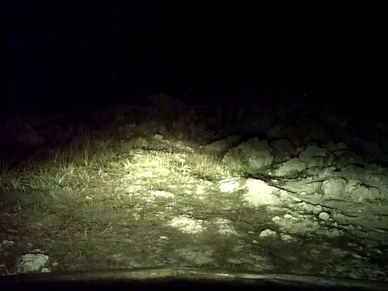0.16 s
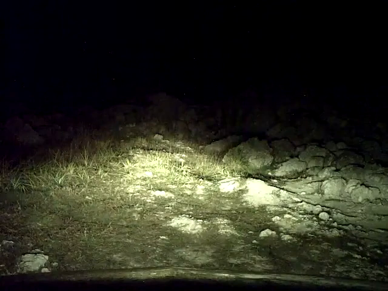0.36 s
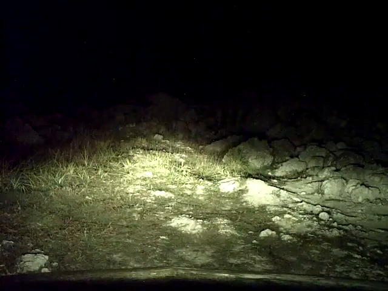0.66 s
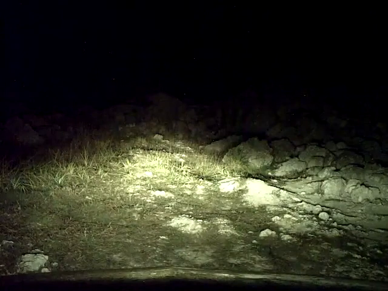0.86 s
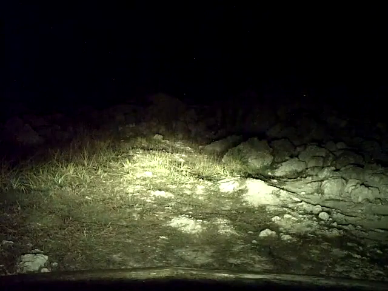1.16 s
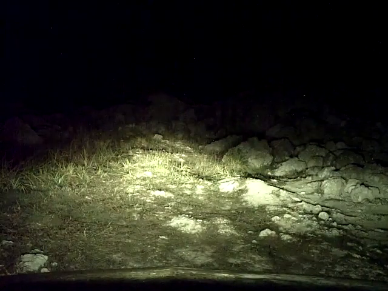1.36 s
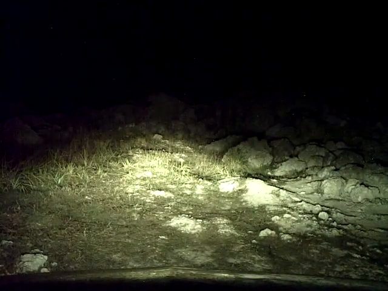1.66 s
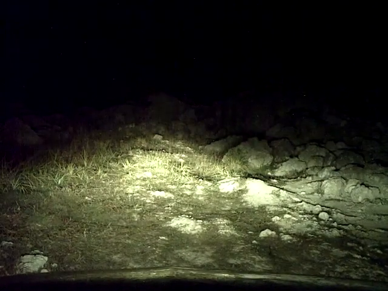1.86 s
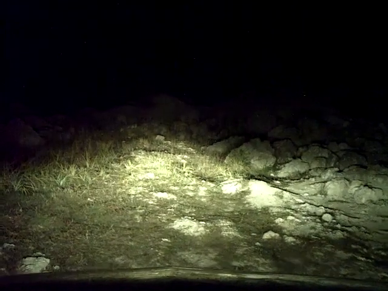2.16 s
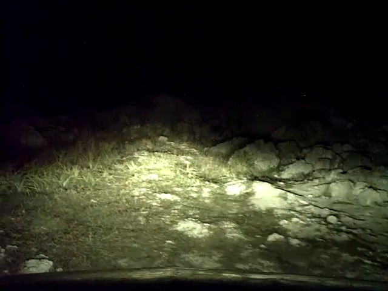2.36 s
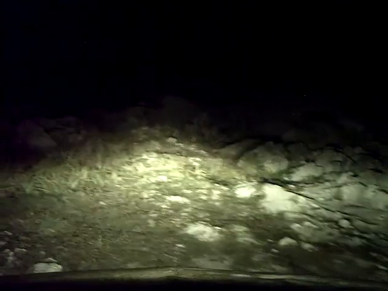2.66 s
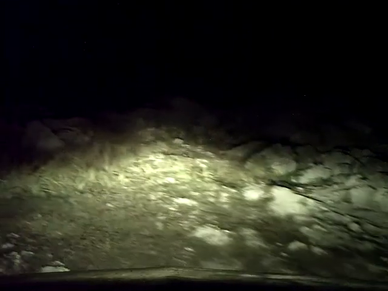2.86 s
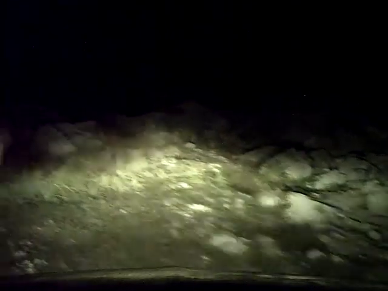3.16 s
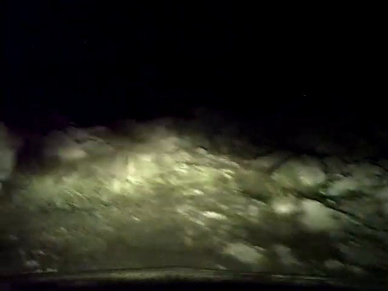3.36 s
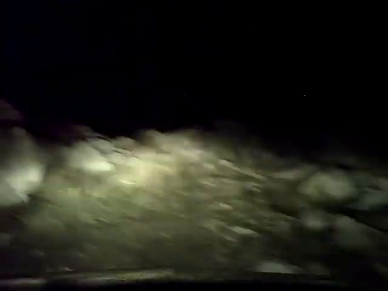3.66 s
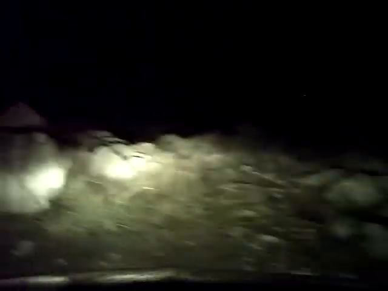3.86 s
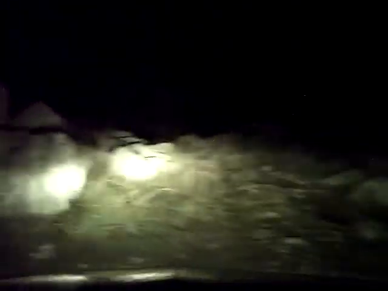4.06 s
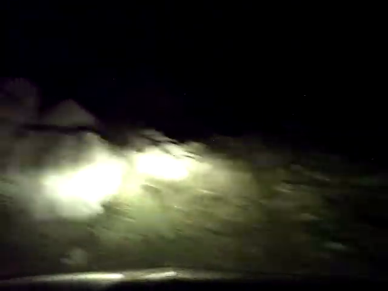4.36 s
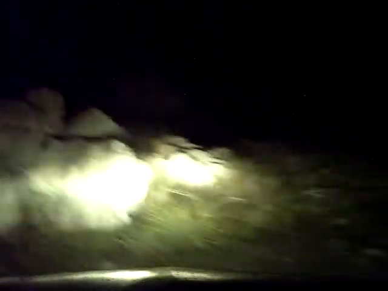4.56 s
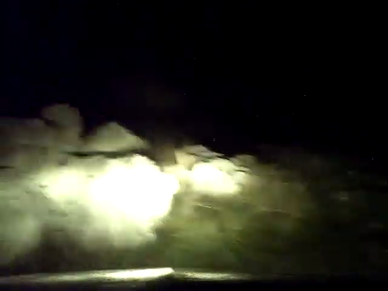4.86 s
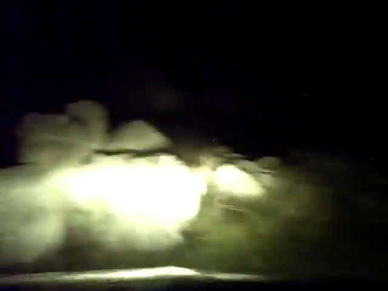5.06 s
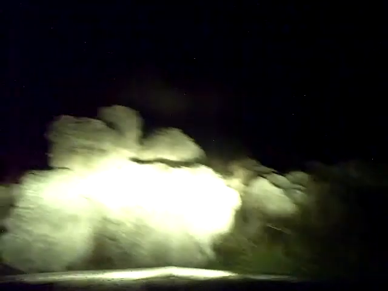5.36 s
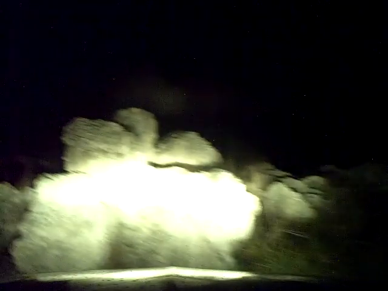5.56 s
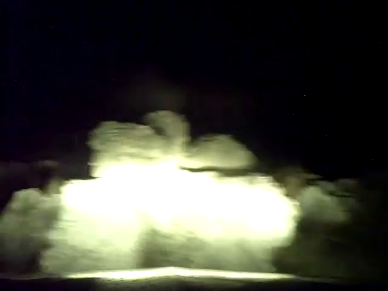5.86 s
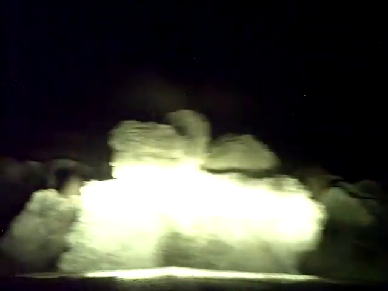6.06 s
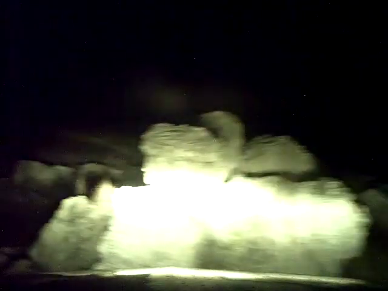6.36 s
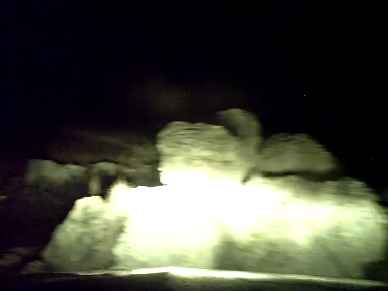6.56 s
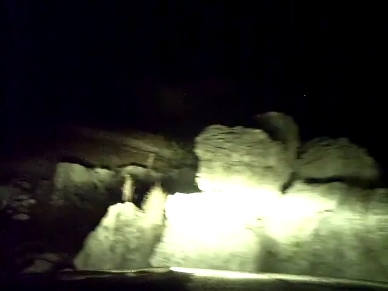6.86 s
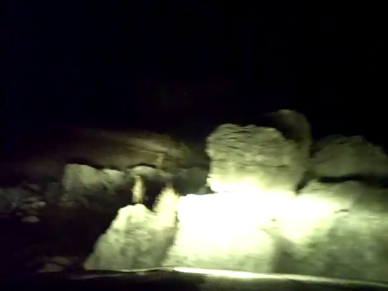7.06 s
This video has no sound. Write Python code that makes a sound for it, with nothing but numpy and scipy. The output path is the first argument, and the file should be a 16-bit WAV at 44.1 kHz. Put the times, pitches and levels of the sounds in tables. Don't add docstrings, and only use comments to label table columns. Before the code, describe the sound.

Boomy truck engine heard from the cab, crawling over rocks: a brief surge, rattling and groaning, then denser clatter, with faint crickets outside.

```python
import sys
import numpy as np
from scipy import signal
from scipy.io import wavfile
from scipy.ndimage import uniform_filter1d

SR = 44100
rng = np.random.default_rng(int(sys.argv[2]) if len(sys.argv) > 2 else 0)


def to_linear_factor(level_db):
    exponent = np.asarray(level_db, float) / 20
    return 10 ** exponent


def file_out(sig):
    cols = np.atleast_2d(sig).T
    lim = np.clip(cols, -1, 1)
    pcm = np.round(lim * 32767).astype(np.int16)
    wavfile.write(sys.argv[1], SR, pcm)


N = 317520
TIME = np.arange(N) / SR


def rms_one(x):
    return x / np.sqrt(np.mean(x ** 2) + 1e-20)


def in_time(rows):
    s, value = np.transpose(rows)
    return np.interp(TIME, s, value)


def at_hz(points, hz):
    table_hz, db = np.transpose(points)
    return np.interp(np.log(hz), np.log(table_hz), db)


def swell(s, rise_s, fall_s):
    return np.exp(-((TIME - s) / np.where(TIME < s, rise_s, fall_s)) ** 2)


def drift(rate):
    r = np.exp(-80 * np.pi * rate / SR)
    white = rng.standard_normal(N // 40 + 2002)
    slow = signal.lfilter([1], [1, -2 * r, r * r], white)[2000:]
    return np.interp(np.arange(N) / 40, np.arange(len(slow)), rms_one(slow))


def wave(hz):
    return np.sin(2 * np.pi * np.cumsum(hz) / SR)


def resonate(x, hz, width_hz):
    r = np.exp(-np.pi * width_hz / SR)
    feedback = [1, -2 * r * np.cos(2 * np.pi * hz / SR), r * r]
    return signal.lfilter([(1 - r * r) / 2, 0, (r * r - 1) / 2], feedback, x)


def band(x, low_hz, high_hz):
    sos = signal.butter(2, [low_hz, min(high_hz, .45 * SR)], "band", fs=SR, output="sos")
    return signal.sosfilt(sos, x)


def banded_noise(spectrum, patchy_db, flicker):
    hz = np.transpose(spectrum)[0]
    edges = hz[0] * 2 ** np.arange(0, np.log2(hz[-1] / hz[0]), 1 / 3)
    out, together, white = 0, drift(flicker), rng.standard_normal((2, N))
    for k, (low, high) in enumerate(zip(edges, edges[1:])):
        level_db = at_hz(spectrum, np.sqrt(low * high))
        flicker_db = patchy_db * (0.61 * together + drift(flicker))
        out = out + to_linear_factor(level_db + flicker_db) * band(white[k % 2], low, high)
    return rms_one(out)


def add(out, s, piece):
    at = round(s * SR)
    out[at:at + len(piece)] += piece[:N - at]


def whistles(rows):
    out = np.zeros(N)
    for s, length, hz, glide_hz, db in rows:
        t = TIME[:round(length * SR)]
        rough = 1 + 3 * band(rng.standard_normal(SR // 4), 30, 200)[-len(t):]
        tone = np.sin(2 * np.pi * (hz * t + glide_hz * t * t / length / 2))
        add(out, s, np.sqrt(2) * to_linear_factor(db) * rough * np.sin(np.pi * t / length) * tone)
    return out


def blows(rows, rise, octaves, click, ring=0):
    out, t, half = np.zeros(N), TIME[:SR // 4], 2 ** (np.clip(octaves, .15, 3.5) / 2)
    for s, db, hz, length in rows:
        tail = 0.032 * np.exp(-t / (4.2 * length))
        shape = (1 - np.exp(-t / rise)) * (np.exp(-(t / length) ** 2) + tail)
        strength = np.sqrt(np.sum(shape ** 2))
        push = shape * rng.standard_normal(len(t))
        push[round(rise * SR)] += click * strength
        push += ring * np.sqrt(hz / SR) * shape * np.sin(2 * np.pi * hz * t)
        burst = band(push, hz / half, hz * half)
        burst += 0.029 * band(push, hz / half / 3, hz / half)
        add(out, s - rise, to_linear_factor(db) * burst * strength / np.sqrt(np.sum(burst ** 2)))
    return out


def far_cricket():
    # (time [s], level [dB])
    chirps = [(.06, -79), (.13, -78), (.451, -79), (.52, -82), (.59, -80), (1.04, -79), (1.12, -80),
              (1.19, -82), (1.5, -81), (1.629, -79)]
    return whistles([(s, .05, 4120, -420, db - 0.5) for s, db in chirps])


def near_cricket():
    # (time [s], level [dB])
    trill = [
        (0, -83),
        (2.2, -84.5),
        (4, -88),
        (5.9, -86),
        (6.2, -80),
        (6.3, -74),
        (6.65, -74.5),
        (6.78, -82),
        (7.2, -84),
    ]
    note_hz, width_hz, throbs_per_s = 6115, 250, 42.7
    turn = 2 * np.pi * throbs_per_s * TIME + .5
    gate = np.exp(.8 * np.cos(turn) + .5 * np.cos(3 * turn))
    waver = 2.4 * np.sin(turn + 1) + 1.5 * drift(10)
    note = np.sin(2 * np.pi * note_hz * TIME + waver)
    note += .5 * rms_one(resonate(rng.standard_normal(N), note_hz, width_hz))
    return to_linear_factor(in_time(trill)) * rms_one(gate * note)


def noise_gain(firing_hz, idle_db, doubling_db, ground_share):
    # (time [s], level over smooth going [dB])
    ground = [(0, 1.5), (.3, 0), (1.4, 1), (1.8, 2), (2.3, 2), (2.9, 1.5), (3.6, 1), (4.0, 0.5), (4.6, 0.5),
              (5.0, 4.5), (5.3, 3.5), (5.6, 3.5), (5.85, 1.5), (6.1, 1.5), (6.3, 1), (6.7, 1.5), (7.0, 2.5),
              (7.2, 7)]
    return to_linear_factor(idle_db + doubling_db * np.log2(firing_hz / 28) + ground_share * in_time(ground))


def hiss(firing_hz):
    # (frequency [Hz], level [dB per Hz])
    spectrum = [(1180, -23), (2000, 1.5), (4380, -7), (6000, -1.5), (8210, -9.5), (9860, 12), (10500, -4),
                (11500, -43), (15000, -59), (22000, -120)]
    return noise_gain(firing_hz, -70, 1.7, 1.4) * banded_noise(spectrum, patchy_db=1.14, flicker=15.4)


def roar(firing_hz):
    # (frequency [Hz], level [dB per Hz])
    spectrum = [(220, -16), (380, -6), (520, -9), (667, -9), (998, -15.5), (1120, -13), (1390, -15),
                (1820, -32.5), (2600, -35.5), (3380, -33.5), (5720, -120)]
    # (frequency [Hz], width [Hz], level [dB])
    bulkhead = [(1129, 27, -16), (1415, 77, -22), (1796, 27, -39), (2090, 200, -23.5)]
    throb = 1 + 0.087 * np.cos(2 * np.pi * np.cumsum(firing_hz) / SR)
    noise = banded_noise(spectrum, patchy_db=1.2, flicker=10.6)
    for hz, width_hz, db in bulkhead:
        noise += to_linear_factor(db) * rms_one(resonate(rng.standard_normal(N), hz, width_hz))
    return noise_gain(firing_hz, -58, 7.1, 0.76) * throb * noise


def rumble(firing_hz):
    # (frequency [Hz], level [dB per Hz])
    spectrum = [(24, -22.5), (40, -10.5), (62, -9), (95, -7.5), (129, -11), (246, -12), (500, -33),
                (650, -71), (1100, -120)]
    return noise_gain(firing_hz, -47, 6.1, 0.82) * banded_noise(spectrum, patchy_db=1.0, flicker=23.0)


def rocking():
    # (frequency [Hz], wander [Hz], level [dB])
    mounts = [(18.7, 0.24, -3.5), (23.7, 1.27, -6), (35.5, 1.867, -10), (45.26, 2.186, -11)]
    # (time [s], level [dB])
    sways = [(.2, -42), (.95, -40), (1.5, -37.5), (2.0, -36), (2.6, -37), (3.202, -36), (3.8, -33),
             (4.8, -32), (5.25, -32), (6.0, -34.5), (6.45, -41.5), (7.0, -34)]
    sway_s, always_db = 0.14, -45
    strength = to_linear_factor(always_db) + sum(to_linear_factor(db) * swell(s, sway_s, sway_s) for s, db in sways)
    motion = 0
    for hz, wander_hz, db in mounts:
        motion = motion + to_linear_factor(db + 1.0 * drift(1.8)) * wave(hz + wander_hz * drift(2.07))
    return strength * rms_one(motion)


def rustle():
    # (time [s], level [dB], pitch [Hz], length [s])
    rows = [
        (6.8, -67, 7400, 0.18),
        (6.92, -68, 7440, 0.17),
    ]
    return blows(rows, rise=0.027, octaves=.8, click=0)


def squeaks():
    # (time [s], length [s], pitch [Hz], glide [Hz], level [dB])
    rows = [(0.47, 0.12, 2600, -140, -80), (.56, .09, 2640, 50, -78), (0.65, 0.06, 2900, 30, -72),
            (.58, .07, 2520, 0, -78), (1.93, .23, 1745, 60.5, -68), (2.17, .16, 1795, 0, -70.5),
            (3.52, .19, 1790, 0, -68.5), (2, .08, 1640, 20, -70), (0.29, 0.13, 3360, 2, -84),
            (1.595, 0.06, 2490, -68, -68), (1.61, 0.063, 3350, 2, -76), (1.739, 0.0034, 10000, 2, -59.5),
            (1.4, .004, 9900, 0, -64), (1.848, 0.0035, 9900, 9, -62), (6.445, .012, 10020, 0, -76),
            (6.1, 0.01204, 10080, 2, -73), (6.146, .012, 10180, 0, -78), (6.2, 0.017, 10100, -3, -70),
            (6.3, 0.013, 10100, 0, -68)]
    return whistles(rows)


def creaks():
    # (time [s], level [dB], pitch [Hz], length [s])
    rows = [(1.0, -47.5, 124, .25), (.05, -46, 124.6, .15), (1.1, -44, 88, .2), (3.2, -40, 93, 0.093),
            (4.17, -41, 130, 0.096), (6.62, -46, 128, .08), (3.58, -40, 160, .06), (5.7, -43, 124, .1),
            (5.3, -39, 160, .06), (7.11, -40, 210, .05)]
    return blows(rows, rise=.02, octaves=0.37, click=0, ring=1.1)


def groans():
    # (time [s], level [dB], pitch [Hz], length [s])
    rows = [(1.7, -47.5, 274, 0.13), (3.74, -50.5, 520, 0.064), (1.43, -51.5, 320, 0.092),
            (4.1, -54.5, 460, 0.11), (1.85, -52.5, 806, 0.04), (2.1, -44, 186.5, 0.09),
            (2.85, -45, 175, 0.22), (2.4, -50, 382, .1), (2.28, -40.5, 189, 0.13), (2.3, -51, 586, 0.39),
            (2.45, -50, 268, 0.3), (4.405, -66.5, 3085, 0.068), (4.42, -69, 5560, 0.051),
            (5.05, -30, 37.3, 0.058), (5.995, -48, 390, 0.061), (6.8, -48, 435, 0.029),
            (6.848, -42.5, 405, 0.022)]
    return blows(rows, rise=0.0072, octaves=0.29, click=0.28)


def ticks():
    # (time [s], level [dB], pitch [Hz], length [s])
    rows = [(.22, -67, 7490, .014), (1.135, -64, 4910, .008), (1.173, -56, 5600, 0.01),
            (1.215, -65.5, 6590, 0.024), (2.026, -58.5, 5510, 0.013), (2.336, -62.5, 7380, 0.031),
            (2.391, -56, 5370, 0.0055), (2.673, -54.5, 7200, 0.009), (2.794, -62, 6020, .005),
            (2.803, -58, 6000, .01), (4.02, -59, 6500, 0.0039), (4.067, -62, 7000, 0.0038),
            (2.694, -60, 7500, .003), (2.726, -63, 6500, .008), (.8, -64, 4800, 0.012),
            (4.297, -63, 4023, .017), (4.6, -62, 5370, 0.0054), (4.818, -68, 5770, 0.019),
            (4.857, -55.5, 3785, 0.0052), (4.921, -59, 6030, 0.0076), (4.974, -62, 5024, 0.018),
            (5.143, -51, 6230, 0.027), (5.172, -65, 5490, .023), (5.423, -51, 6210, 0.012),
            (5.446, -54, 5890, .01), (5.527, -58.5, 4960, 0.035), (5.545, -47, 4300, 0.012),
            (5.746, -67, 5270, 0.0098), (5.969, -61, 6100, 0.018), (5.982, -67, 7000, .01),
            (6.22, -70, 6000, .01), (6.187, -68, 4500, 0.023), (6.77, -49.5, 4370, 0.0087),
            (6.976, -65, 6350, 0.021), (7.151, -54, 3556, 0.0076)]
    return blows(rows, rise=0.0013, octaves=1.0, click=0.47)


def pings():
    # (time [s], level [dB], pitch [Hz], length [s])
    rows = [(2.616, -49.5, 2800, 0.0029), (2.638, -62, 4900, .003), (3.1, -66, 8200, .004),
            (3.31, -59, 3350, .004), (3.672, -52, 775, .012), (4.085, -48, 474, .01),
            (3.958, -56, 1750, .02), (4.02, -56, 5500, 0.0047), (4.067, -52.5, 6140, 0.0047),
            (5.834, -47.5, 830, 0.024), (5.51, -49, 620, .008), (4.297, -57, 1630, 0.02),
            (4.3, -62, 2900, .014), (4.313, -55.5, 1480, 0.016), (4.3, -58, 890, 0.008),
            (3.958, -64, 2300, .015), (7.026, -52, 680, 0.0037), (7.067, -45, 484, .012),
            (5.957, -50, 660, 0.013)]
    return blows(rows, rise=0.001, octaves=0.33, click=1.0, ring=1.1)


def clacks():
    # (time [s], level [dB], pitch [Hz], length [s])
    rows = [(.05, -64, 2900, 0.013), (.02, -66, 2600, .008), (1.17, -55, 1290, 0.011),
            (1.295, -55, 1140, 0.011), (1.775, -58, 2500, 0.0087), (1.79, -62, 3000, .012),
            (.796, -63, 2200, 0.0055), (3.672, -61, 1900, 0.0087), (4.018, -57, 2400, 0.0044),
            (4.599, -61, 1700, .008), (4.812, -69, 1920, .01), (5.093, -58, 1700, .015),
            (5.331, -61, 2550, .006), (5.642, -59, 1800, .008), (6.974, -65, 1850, .008),
            (3.161, -57, 1262, 0.029), (3.956, -65, 1960, 0.015), (4.296, -56.5, 1900, 0.016),
            (4.64, -63, 2780, 0.0055), (4.859, -56, 1163, 0.012), (4.972, -51.5, 1280, .012),
            (4.995, -58, 1978, 0.02), (5.141, -57, 2566, .028), (5.183, -59, 2205, .022),
            (5.404, -53, 1387, 0.0053), (5.425, -56.5, 2470, 0.012), (5.511, -56, 1790, 0.04),
            (5.528, -53, 3000, 0.011), (5.545, -44.5, 2090, 0.015), (5.651, -60, 1088, 0.021),
            (5.684, -60, 2300, 0.013), (5.826, -58, 2188, 0.0078), (6.06, -66, 6000, .008),
            (6.076, -53, 2080, 0.0096), (6.078, -63, 5200, .008), (6.19, -54.5, 2190, 0.0074),
            (6.621, -56, 1490, 0.023), (6.77, -55, 1488, 0.0061), (7.149, -47, 2280, 0.015)]
    return blows(rows, rise=0.00119, octaves=0.87, click=0.33)


def knocks():
    # (time [s], level [dB], pitch [Hz], length [s])
    rows = [(.013, -56, 960, 0.02), (.051, -48, 630, 0.0056), (2.241, -42.5, 690, 0.012),
            (2.392, -50, 640, 0.021), (.252, -54, 680, .008), (.543, -56, 690, .008),
            (.792, -55, 700, .008), (1.171, -52, 900, .008), (2.673, -50, 520, 0.0091),
            (3.372, -53, 650, .008), (3.589, -44, 497, 0.0087), (3.647, -45, 550, 0.0097),
            (3.672, -50, 1100, 0.012), (4.04, -52, 480, 0.011), (4.414, -56, 670, .008),
            (4.915, -50.5, 785, .015), (4.973, -48, 550, 0.011), (5.097, -48, 520, 0.01),
            (5.51, -51, 480, .008), (5.543, -49, 484, 0.012), (6.417, -51, 595, 0.0091),
            (6.675, -49, 520, 0.0091), (6.766, -49, 480, .008), (3.899, -42.5, 550, 0.008),
            (3.955, -47, 524, 0.012), (3.955, -52, 1000, 0.0072), (4.025, -58, 1120, 0.022),
            (4.299, -45.5, 740, 0.011), (4.6, -47.5, 750, 0.0099), (4.678, -44, 785, 0.0065),
            (4.824, -45.5, 560, 0.014), (4.86, -50, 990, 0.011), (5.092, -51.5, 876.5, 0.032),
            (5.338, -43.5, 680, 0.0082), (5.57, -54, 703, 0.016), (5.682, -38.5, 680, 0.0044),
            (5.765, -53, 720, 0.02), (5.823, -43.5, 890, 0.016), (5.957, -51, 755, 0.018),
            (6.19, -46, 550, 0.028), (6.193, -50, 1150, 0.018), (6.35, -52, 690, .014),
            (7.026, -45, 865, 0.0039), (7.065, -53, 602, .015)]
    return blows(rows, rise=0.001164, octaves=0.72, click=0.79, ring=0.82)


def thuds():
    # (time [s], level [dB], pitch [Hz], length [s])
    rows = [(.03, -38, 225, 0.023), (.05, -39.5, 380, 0.011), (3.668, -37, 300, 0.013),
            (3.93, -32.5, 131, .015), (.81, -35, 105, .02), (5.83, -38.5, 333, 0.01),
            (6.21, -37, 240, .015), (.795, -34, 330, 0.0068), (.812, -33, 322, 0.014),
            (.803, -29, 155, 0.029), (3.898, -35, 280, 0.01), (3.957, -44.5, 480, 0.034),
            (3.958, -30, 134, 0.027), (3.99, -29.5, 156, 0.0084), (4.172, -29, 175, 0.0069),
            (4.21, -37.5, 130, 0.022), (4.527, -35.5, 152, 0.013), (4.698, -38, 220, 0.0093),
            (5.125, -35.5, 160, 0.011), (4.995, -39, 284, 0.029), (5.587, -42.5, 360, 0.015),
            (5.684, -30, 159.9, 0.0084), (5.765, -34.5, 200, .012), (5.783, -33, 184, 0.014),
            (5.44, -42, 258, 0.0088), (5.82, -31.5, 213, 0.0089), (2.36, -34, 193, 0.02),
            (6.89, -37, 216, 0.0075), (6.198, -38, 273, 0.02), (6.453, -31.5, 207, 0.007),
            (6.623, -31.5, 190, 0.012), (6.676, -29.5, 157, 0.0091), (7.061, -32, 330, 0.007),
            (7.118, -46.5, 420, 0.073), (7.141, -29.5, 185, 0.011), (7.192, -39, 480, .006)]
    return blows(rows, rise=0.001975, octaves=0.78, click=1.23, ring=1.47)


def loose_panel(firing_hz):
    # (frequency [Hz], width [Hz], level [dB])
    modes = [(1170, 40, -3), (1250, 45, 0), (1320, 50, -3), (1400, 40, -3), (1780, 30, -16)]
    # (time of the peak [s], level [dB], swell [s], fade [s])
    rattles = [
        (1.5, -62.5, 0.099, 0.062),
        (1.8, -70, 0.031, 0.1),
        (1.62, -57.5, 0.06, 0.14),
        (1.95, -54.5, 0.062, 0.079),
        (2.03, -52, 0.04, 0.028),
        (2.1, -44.5, 0.038, 0.037),
        (2.2, -57, 0.045, 0.056),
    ]
    touch_hz = 2 * firing_hz * to_linear_factor(1.2 * drift(30))
    touches = np.diff(np.floor(np.cumsum(touch_hz) / SR), prepend=0)
    hits = touches * to_linear_factor(1.1 * rng.standard_normal(N)) * rng.choice([-1, 1], N)
    hits += 0.094 * rng.standard_normal(N)
    rings = 0
    for k, (hz, width_hz, db) in enumerate(modes):
        ringing = resonate(resonate(hits, hz, width_hz), hz, 3 * width_hz)
        rings = rings + (-1) ** k * to_linear_factor(db) * ringing
    strength = sum(to_linear_factor(db) * swell(s, rise_s, fall_s) for s, db, rise_s, fall_s in rattles)
    return strength * rms_one(rings)


def engine_speed():
    # (time [s], firing rate [Hz])
    speed = [(.3, 29.5), (.9, 27.6), (1.38, 26), (1.6, 30), (1.75, 34.35), (1.9, 42.06), (2.15, 46.5),
             (2.75, 42.8), (3.05, 43.2), (3.62, 46), (3.85, 42.6), (4.2, 31.5), (4.6, 28), (5.15, 29.6),
             (5.4, 28.7), (5.85, 30), (6.4, 28.6), (7.2, 29.8)]
    return in_time(speed)


def engine(firing_hz):
    # (time [s], level [dB])
    firing_level = [(0, -37.5), (.2, -33), (.55, -38), (1.35, -38), (1.6, -30), (1.7, -22.8), (1.8, -20.3),
                    (1.9, -22.8), (2.2, -23.2), (2.7, -25), (3.1, -23), (3.68, -26.5), (3.92, -30),
                    (4.04, -35.5), (4.4, -36), (4.75, -42), (5.7, -34), (7.2, -34.5)]
    # (multiple of firing rate, level when pulling [dB], gain per doubling of speed [dB])
    orders = [(.5, -39, 28), (1.5, -48, 10), (2, -48, -4), (2.5, -46, 4), (3, -50, 11.5), (3.5, -48.5, 9),
              (4, -53, 4), (4.5, -57, 19.5), (5, -66.5, 4), (5.5, -56.5, 13), (6, -58.5, 0.5), (7, -62, 6),
              (8, -61.5, 1)]
    # (frequency [Hz], level [dB])
    cab = [(20, -0.5), (40, -3), (52, 3.5), (58, 1), (66, -2), (75, 7.5), (86, 3), (92, -5), (112, -9),
           (129, 10), (137, -1), (160, -12.5), (180, 5), (270, -2.5)]
    floor_hz, floor_t60_s, floor_db = 34.3, 2.0, 3.9
    turn = 2 * np.pi * np.cumsum(firing_hz) / SR

    def tone(k, db, wobble_db):
        gain = np.sqrt(2) * to_linear_factor(db + wobble_db * drift(6.5))
        return gain * np.sin(k * turn + rng.uniform(0, 2 * np.pi))

    uneven_db = .5 + 1.5 * np.clip((31 - firing_hz) / 2, 0, 1)
    firing = tone(1, in_time(firing_level), uneven_db)
    floor_width_hz = np.log(1000) / np.pi / floor_t60_s
    out = firing + to_linear_factor(floor_db) * resonate(firing, floor_hz, floor_width_hz)
    pick_up = uniform_filter1d(np.gradient(np.log2(firing_hz)) * SR, size=SR // 10)
    pull_db = 3 * np.maximum(pick_up, 0)
    for k, db, load_db in orders:
        level_db = db + load_db * np.log2(firing_hz / 44) + at_hz(cab, k * firing_hz)
        if k < 3 or k > 7:
            level_db = level_db + pull_db
        out += tone(k, level_db, wobble_db=1.6)
    return out


def scene():
    firing_hz = engine_speed()
    outside = far_cricket() + near_cricket()
    body = hiss(firing_hz) + roar(firing_hz) + rumble(firing_hz) + rocking()
    strained = rustle() + squeaks() + creaks() + groans()
    struck = ticks() + pings() + clacks() + knocks() + thuds()
    return (outside + body + strained + struck + loose_panel(firing_hz) + engine(firing_hz))[None]


def band_limit(x):
    return signal.sosfilt(signal.butter(12, 16820, fs=SR, output="sos"), x)


def record(dry):
    x = signal.sosfilt(signal.butter(8, 10600, fs=SR, output="sos"), dry)
    x = signal.sosfilt(signal.cheby2(12, 30, 12300, fs=SR, output="sos"), x)
    gap_s, lift_db, drop_db, fade_s = 5.25328, -29.5, -20.5, 0.013
    fade = np.exp(-np.abs(TIME - gap_s) / fade_s)
    x = x + np.where(TIME < gap_s, to_linear_factor(lift_db), -to_linear_factor(drop_db)) * fade
    x = signal.sosfiltfilt(signal.cheby2(10, 40, 17100, fs=SR, output="sos"), x)
    return band_limit(x)


dry = scene()
out = record(dry)
file_out(out)
```